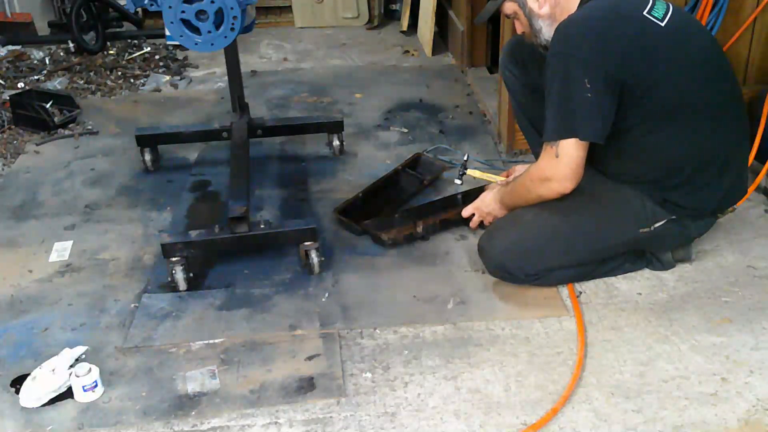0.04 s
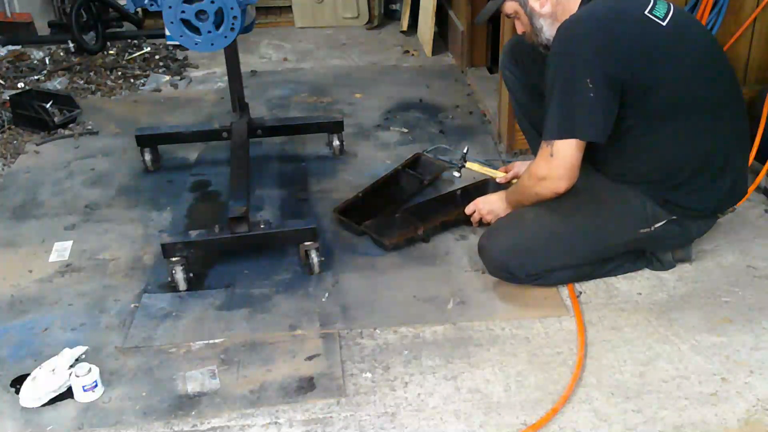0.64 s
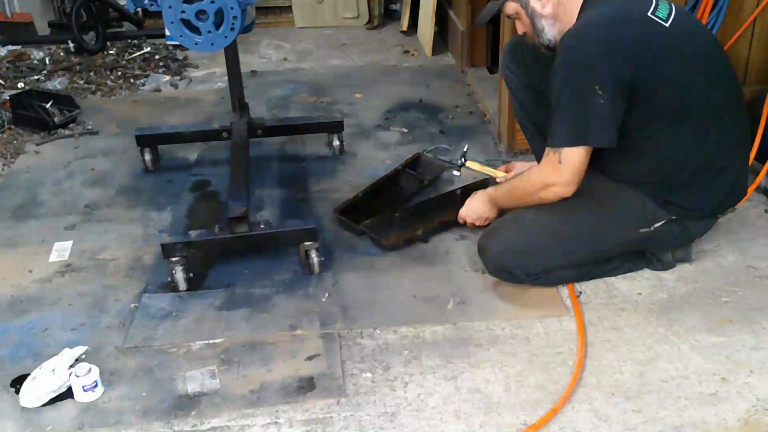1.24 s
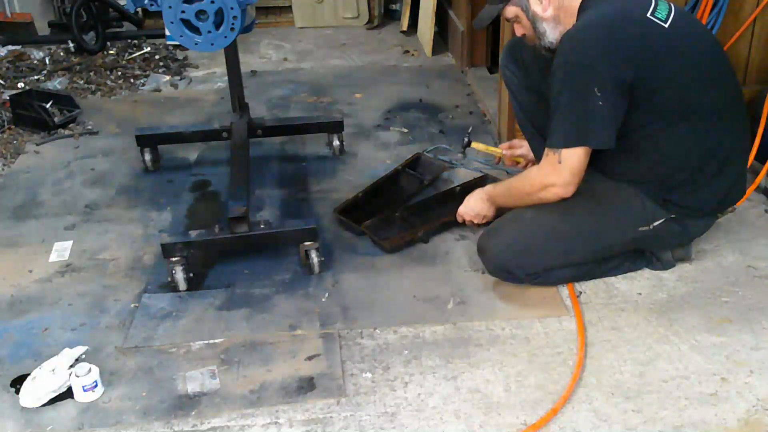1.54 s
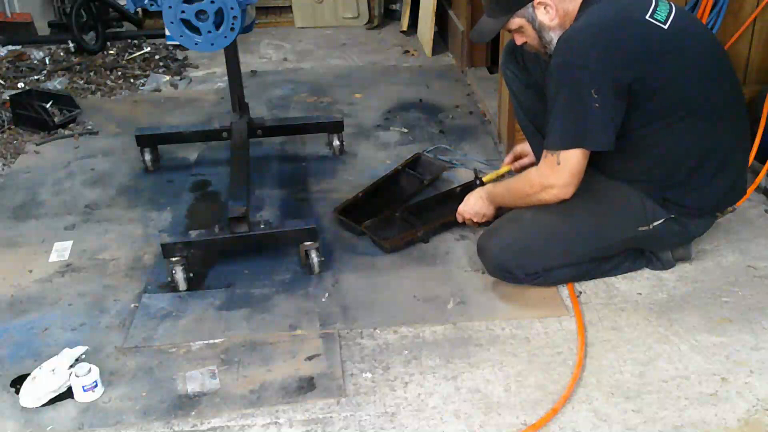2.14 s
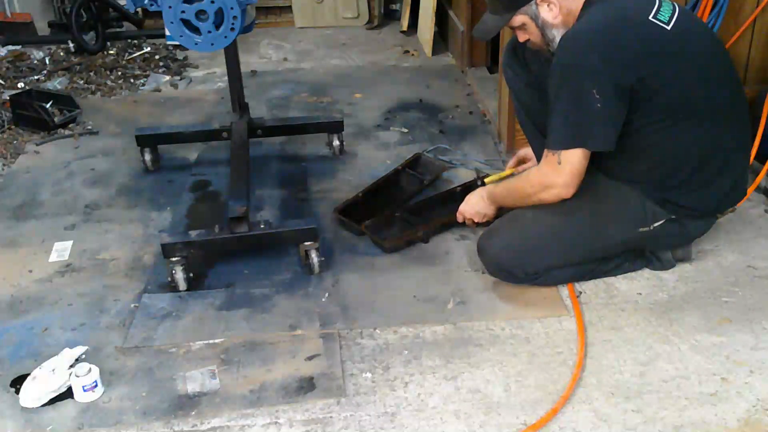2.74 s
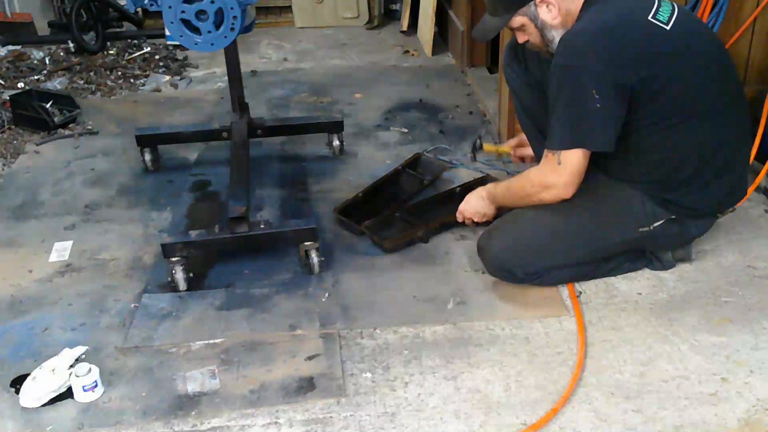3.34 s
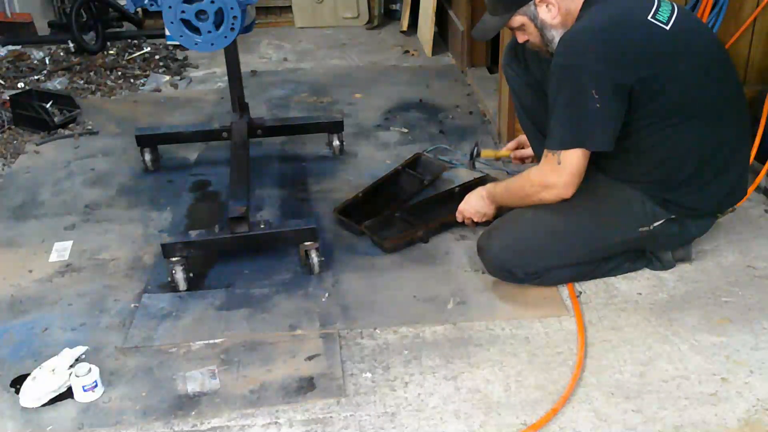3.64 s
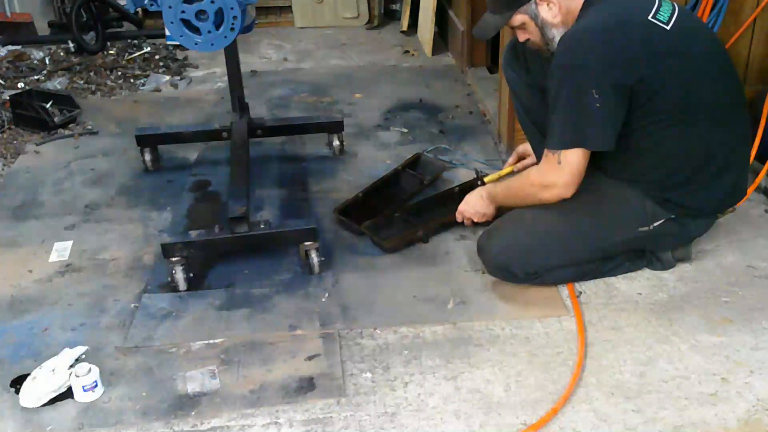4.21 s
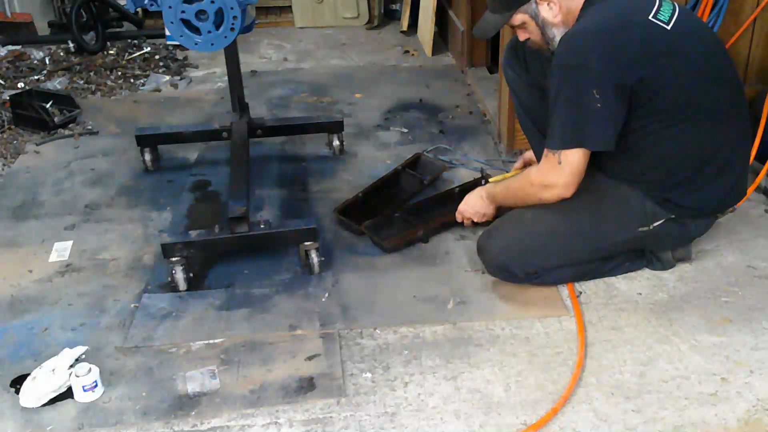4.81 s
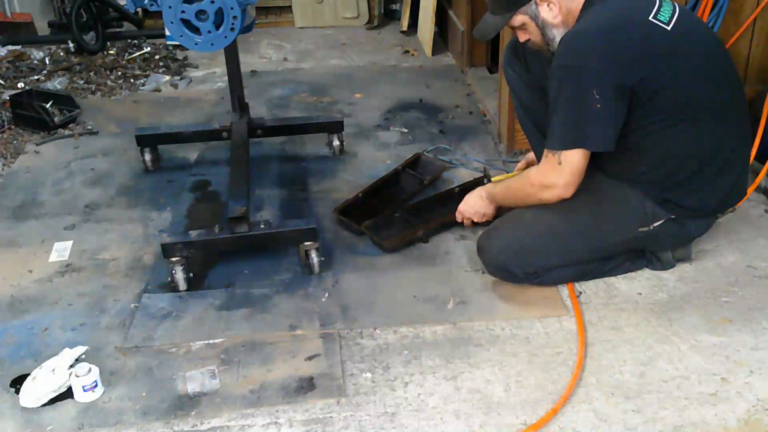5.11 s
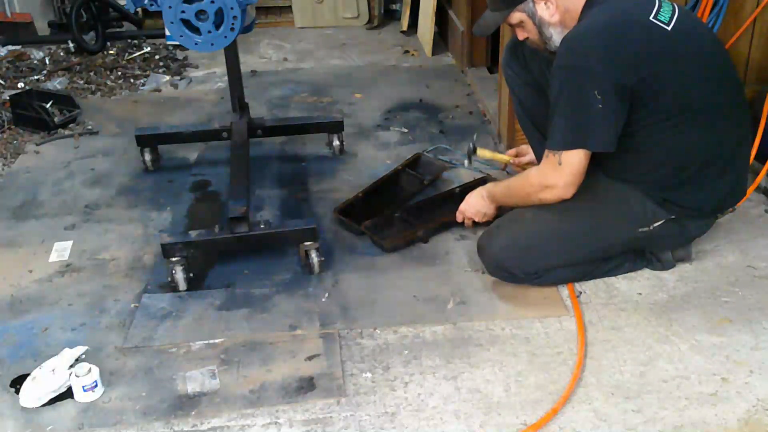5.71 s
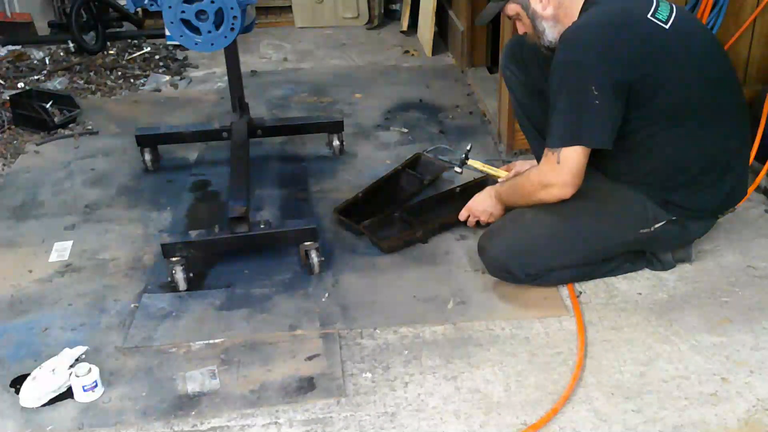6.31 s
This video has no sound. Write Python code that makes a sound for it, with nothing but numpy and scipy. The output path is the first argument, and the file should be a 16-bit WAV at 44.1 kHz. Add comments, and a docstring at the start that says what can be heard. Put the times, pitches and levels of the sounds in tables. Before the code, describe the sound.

A faint, steady low rumble and hiss fills a garage. During the first 1.4 seconds, a thin steel cover is lined up against a backing piece with very quiet slides and a few light, dull taps. After a short pause, at about 2.1 seconds, a hammer begins striking the cover's edge. Eleven loud blows fall evenly, about three a second, the last at about 5.4 seconds. Each is a sharp, clattering metallic clang that rings and echoes for roughly half a second. The first three are boomier and hollower, while those from about 3.1 seconds carry a brighter, thin clink. The blows overload the microphone, sounding slightly crunchy, with the very highest treble missing. At about 6 seconds the cover shifts with a brief slide and a much softer metallic knock, followed by one tiny tap.

```python
"""A garage with a concrete floor, where a hammer flattens the flange of a stamped-steel valve cover
against a backing piece. Slides and light taps line it up, eleven hard blows follow, and the cover is
shifted once more. Each impact excites the sheet's normal modes and a diffuse reverberant field, both
decaying exponentially. The hard blows overload a narrow-band microphone."""
import sys
import numpy as np
from scipy import signal
from scipy.fft import rfft, irfft, next_fast_len
from scipy.io import wavfile
from scipy.ndimage import uniform_filter1d

SR = 44100
rng = np.random.default_rng(int(sys.argv[2]) if len(sys.argv) > 2 else 0)


def log_audio(samples):
    """Write samples as a 16-bit WAV file to the path given in sys.argv[1]."""
    # one column per channel
    frames = np.atleast_2d(samples).T
    # limit to full scale, then quantise
    limited = np.clip(frames, -1, 1)
    pcm = np.round(limited * 32767).astype(np.int16)
    wavfile.write(sys.argv[1], SR, pcm)


N = 280476
HIT_SAMPLES = int(.64 * SR)
HELD_DECAY, HELD_TUNE = .79, 0.94  # factors on decay time and mode frequency while a hand damps the cover


def undb(db):
    """Amplitude ratio of a level in decibels."""
    return 10 ** (np.asarray(db) / 20)


def unit(x):
    """Normalisation to rms 1."""
    return x / np.sqrt(np.mean(x ** 2))


def lookup(points, hz):
    """Interpolation of (Hz, value) points on a log-frequency axis."""
    f, value = np.transpose(points)
    return np.interp(np.log(hz + 1), np.log(f), value)


def shape(x, gain):
    """Linear filtering: the spectrum of x is multiplied by gain(frequency)."""
    size = next_fast_len(len(x))
    return irfft(rfft(x, size) * gain(np.fft.rfftfreq(size, 1 / SR)), size)[:len(x)]


def coloured(points, count):
    """Gaussian noise of rms 1, filtered to a spectrum of (Hz, dB) points."""
    return unit(shape(rng.standard_normal(count), lambda f: undb(lookup(points, f))))


def bell(f, hz, octaves):
    """A Gaussian band of height 1 on a log-frequency axis."""
    return np.exp(-.5 * (np.log2((f + 1) / hz) / octaves) ** 2)


def fade(t, t60):
    """Exponential decay of 60 dB in t60 seconds."""
    return np.exp(-np.log(1000) * t / t60)


# Each row: frequency in Hz, relative spectral density in dB.
AIR_SPECTRUM = [(15, -39), (25, -10), (80, -5.5), (109, -4), (135, -3.5), (339, -7), (373, -9.5),
                (511, -13.5), (576, -10.5), (733, -14), (2770, -21.5), (4940, -32.5), (8000, -27.5),
                (10400, -44), (17600, -120)]

def garage_air(level_db=-53):
    """Stationary broadband noise forms the quiet background of the garage."""
    return undb(level_db) * coloured(AIR_SPECTRUM, N)


# Each row: start in seconds, level in dB, thud emphasis in dB.
COVER_SLIDES = [(0.105, -60, 25), (0.309, -55.5, 14), (0.43, -52.5, 7), (0.542, -51, 3.5),
                (0.955, -54.5, 0), (5.987, -43.5, 5)]

def slides(echoes):
    """Gradual excitation: sliding on the backing piece stirs the cover's resonances with a slow swell."""
    for start_s, level_db, thud_db in COVER_SLIDES:
        sound = hit(echoes, boom_db=5, boom_hz=1050, clink_db=4, thud_db=thud_db, rise_s=0.019,
                    decay_scale=HELD_DECAY, tune=HELD_TUNE)
        yield start_s, undb(level_db) * sound


def contact_knock(t, start_hz=2100, end_hz=800, glide_s=.0008, peak_s=.0009):
    """Contact transient: a short dull knock that sinks in pitch leads into each hit."""
    cycles = end_hz * t + (start_hz - end_hz) * glide_s * (1 - np.exp(-t / glide_s))
    swell = (t / peak_s) ** 2 * np.exp(1 - (t / peak_s) ** 2)
    return swell * np.sin(2 * np.pi * cycles)


def hit_colour(boom_db, boom_hz, clink_db, thud_db, scatter_db=1.76):
    """Spectral weighting: the gain against frequency that sets one hit's boom, clink and thud."""
    # the point of contact favours some groups of modes and misses others
    spot_hz = np.linspace(500, 8000, 48)
    ripple = np.column_stack([spot_hz, scatter_db * rng.standard_normal(len(spot_hz))])

    def colour(f):
        clink = bell(f, hz=6355, octaves=0.091) + .5 * bell(f, hz=6400, octaves=0.55)
        # a thin 4.1 kHz distortion tone that comes with the clink
        overload_tone = 0.48 * bell(f, hz=4130, octaves=0.042)
        boom = bell(f, hz=boom_hz, octaves=.34)
        thud = bell(f, hz=390, octaves=0.73)
        emphasis_db = boom_db * boom + clink_db * (clink + overload_tone) + thud_db * thud
        return undb(emphasis_db + lookup(ripple, f))
    return colour


# Each row: frequency in Hz, relative spectral density of the sheet's clatter in dB.
CLATTER_SPECTRUM = [(40, -41), (180, -20), (300, -11), (560, -5), (780, 0), (880, 6), (1320, 4.5),
                    (1560, -6.5), (1800, 1), (2500, -0.5), (3700, -5), (5000, -13.5), (6300, -12),
                    (8600, -27.5)]

def clatter(echoes, repeated_share=0.57):
    """Diffuse field: the walls stay put, so part of the power returns in the same pattern at each hit."""
    fresh = coloured(CLATTER_SPECTRUM, HIT_SAMPLES)
    return np.sqrt(repeated_share) * echoes + np.sqrt(1 - repeated_share) * fresh


def echo_pattern(cluster_db=1.0, cluster_s=0.0039):
    """Multipath propagation: the garage's reflections arrive in uneven clusters."""
    size = int(cluster_s * SR)
    noise = rng.standard_normal(HIT_SAMPLES)
    clusters = unit(uniform_filter1d(uniform_filter1d(noise, size), size))
    return unit(coloured(CLATTER_SPECTRUM, HIT_SAMPLES) * undb(cluster_db * clusters))


# Each row: frequency in Hz, reverberation time (T60) of the garage in seconds.
REVERB_TIMES = [(150, 0.42), (800, 0.61), (2500, 0.56), (6500, 0.47)]

def reverberate(field, t, decay_scale):
    """Frequency-dependent absorption: each band dies away in its own T60, times decay_scale."""
    out = 0
    for band_hz, t60 in REVERB_TIMES:
        share = [(hz, float(hz == band_hz)) for hz, _ in REVERB_TIMES]
        out = out + shape(field, lambda f: lookup(share, f)) * fade(t, t60 * decay_scale)
    return out


def floor_thump(t, level_db=-10, t60=0.28):
    """Heavy damping: the backing piece, driven onto the concrete, gives a short low thump."""
    rumble = shape(rng.standard_normal(len(t)), lambda f: bell(f, hz=350, octaves=1.0))
    return undb(level_db) * unit(rumble) * fade(t, t60)


# Each row: natural frequency in Hz, relative level in dB.
COVER_MODES = [(648, -5.5), (722, -4.5), (870, -7.5), (907, 1), (940, -1.5), (1000, -8.5), (1074, -1.5),
               (1140, -10), (1205, 0), (1310, 1.5), (1395, -32), (1525, -9), (1757, -7), (1875, -8),
               (1999, -12.5), (2060, -7.5), (2215, -11.5), (2290, -4), (2408, -7.5), (2778, -47.5),
               (3095, -24), (3209, -5.5), (3510, -10.5), (3850, -20), (4385, -13), (5370, -27),
               (6250, -21.5), (6330, -18)]

def cover_ring(t, colour, decay_scale, tune, scatter_db=2.0, detune=0.0019, beat_spread_hz=5.33):
    """Modal superposition: the cover rings as a sum of damped sinusoids, sustained by the room."""
    hz, db = np.transpose(COVER_MODES)
    strength, shift, split, phase, beat_phase = rng.standard_normal((len(hz), 5)).T
    # each hit lands on another spot, and the grip shifts the modes a little
    gain = undb(db + scatter_db * strength) * colour(hz) / np.linalg.norm(undb(db))
    cycles = np.outer(tune * hz * (1 + detune * shift), t) + phase[:, None]
    # a close neighbour beats against each mode, so the ring swells and dips
    beats = np.outer(beat_spread_hz * split, t) + beat_phase[:, None]
    neighbour_gain, build_s = 0.63, 0.006
    waves = np.sin(2 * np.pi * cycles) + neighbour_gain * np.sin(2 * np.pi * (cycles + beats))
    waves /= np.hypot(1, neighbour_gain)
    decay = fade(t, decay_scale * lookup(REVERB_TIMES, hz)[:, None])
    return gain @ (waves * decay) * (1 - np.exp(-t / build_s))


def hit(echoes, boom_db, boom_hz, clink_db, thud_db, rise_s, decay_scale=1, tune=1,
        knock_db=0, clatter_db=0, ring_db=-1.0, crack_db=-3, crack_t60=0.06, gap_s=0.0019):
    """Impulse response: a knock, then the flange slaps the backing piece and cover and room ring."""
    t = np.arange(HIT_SAMPLES) / SR
    colour = hit_colour(boom_db, boom_hz, clink_db, thud_db)
    field = undb(clatter_db) * reverberate(shape(clatter(echoes), colour), t, decay_scale)
    crack = undb(crack_db) * coloured(CLATTER_SPECTRUM, HIT_SAMPLES) * fade(t, crack_t60)
    thump = floor_thump(t)
    ring = undb(ring_db) * cover_ring(t, colour, decay_scale, tune)
    slap = np.pad(field + crack + thump + ring, (int(gap_s * SR), 0))[:HIT_SAMPLES]
    onset = np.minimum(t / rise_s, 1)  # a glancing or sliding contact swells more slowly than a blow
    return (undb(knock_db) * contact_knock(t) + slap) * onset


# Each row: start in seconds, level in dB, boom emphasis in dB, boom centre in Hz, thud emphasis in dB.
LIGHT_TAPS = [(0.569, -41.5, 5, 944, 17), (0.631, -61, 22, 1000, -2), (0.996, -40.5, 5.5, 1080, 18.5),
              (1.322, -47, 0, 2400, -16), (6.015, -32.5, 13.5, 870, 16.5), (6.025, -21, 2, 950, 3),
              (6.143, -41.5, 6.5, 1090, 4)]

def taps(echoes):
    """Damped free vibration: light taps ring the held cover, with a louder, longer crack and less clatter."""
    for start_s, level_db, boom_db, boom_hz, thud_db in LIGHT_TAPS:
        sound = hit(echoes, boom_db, boom_hz, clink_db=-7, thud_db=thud_db, rise_s=.002,
                    decay_scale=HELD_DECAY, tune=HELD_TUNE,
                    knock_db=4, clatter_db=-1, ring_db=1.5, crack_db=1.0, crack_t60=0.086)
        yield start_s, undb(level_db) * sound


# Each row: start in seconds, level in dB, place from 0 (toward the panel) to 1 (on the flange's edge).
HARD_BLOWS = [(2.0712, -1, .25), (2.4175, 1.5, 0.02), (2.7428, 3.5, .02), (3.0618, 0.5, 0.74),
              (3.4119, 0.5, 0.83), (3.7435, -1, 0.94), (4.0820, 2.5, 0.68), (4.4240, -1, 0.81),
              (4.7684, -1, 0.84), (5.093, 2.5, 0.63), (5.436, 3, 0.48)]

def blows(echoes):
    """Impulsive excitation: blows jolt the cover free to ring; the panel booms and the edge clinks."""
    for start_s, level_db, place in HARD_BLOWS:
        boom_db = np.interp(place, (0, 1), (6.5, -5))
        clink_db = np.interp(place, (0, 1), (-3.5, 13))
        sound = hit(echoes, boom_db, boom_hz=1090, clink_db=clink_db, thud_db=-3.5, rise_s=0.00088)
        yield start_s, undb(level_db) * sound


def scene():
    """Linear superposition: all contacts share one echo pattern and add to the garage's background."""
    hammering = np.zeros(N + HIT_SAMPLES)
    echoes = echo_pattern()
    for start_s, sound in (*blows(echoes), *taps(echoes), *slides(echoes)):
        start = int(start_s * SR)
        hammering[start:start + HIT_SAMPLES] += sound
    return (hammering[:N] + garage_air())[None]


def lowpass(x, hz, order):
    """Band limiting by a maximally flat (Butterworth) filter."""
    return signal.sosfilt(signal.butter(order, hz, fs=SR, output="sos"), x)


def saturate(x, ceiling, hardness):
    """Soft clipping: the wave flattens at the ceiling, with a slightly rounded knee."""
    return x / (1 + np.abs(x / ceiling) ** hardness) ** (1 / hardness)


def record(dry, band_hz=8200, coupling_hz=65, smooth_hz=8100, top_hz=15800):
    """Overload distortion: the narrow-band input clips, its filters overshoot, the output clips again."""
    x = saturate(lowpass(dry, band_hz, order=16), ceiling=0.74, hardness=21)
    x = signal.sosfilt(signal.butter(1, coupling_hz, "high", fs=SR, output="sos"), x)
    x = saturate(lowpass(x, smooth_hz, order=10), ceiling=0.77, hardness=8.0)
    return signal.sosfiltfilt(signal.ellip(8, .1, 60, top_hz, fs=SR, output="sos"), x)


dry = scene()
out = record(dry)
log_audio(out)
```